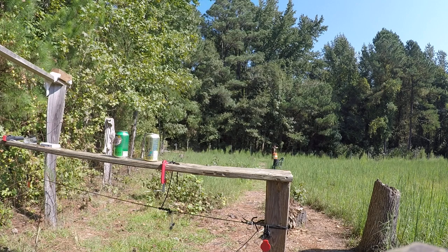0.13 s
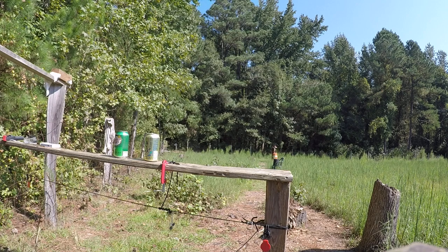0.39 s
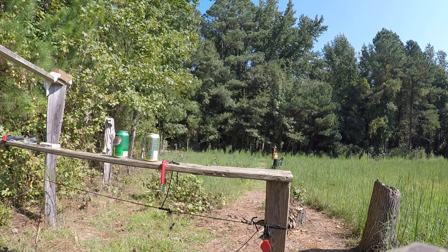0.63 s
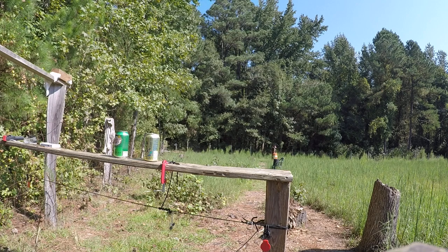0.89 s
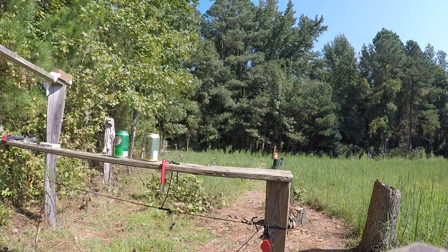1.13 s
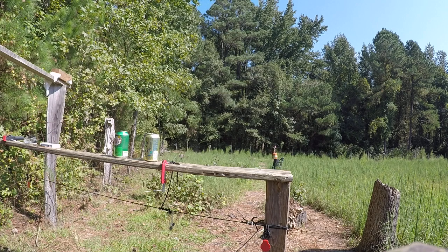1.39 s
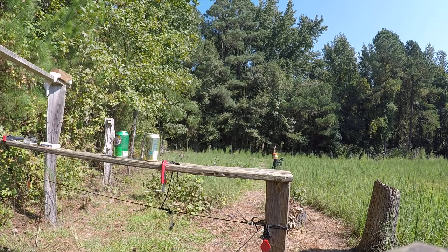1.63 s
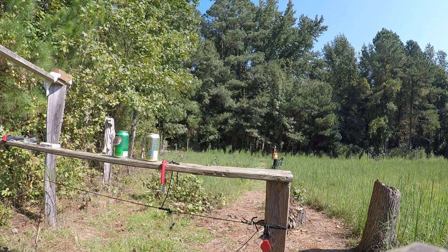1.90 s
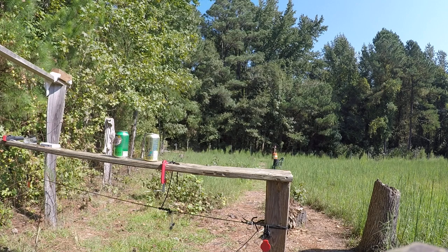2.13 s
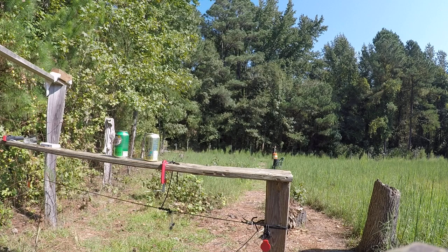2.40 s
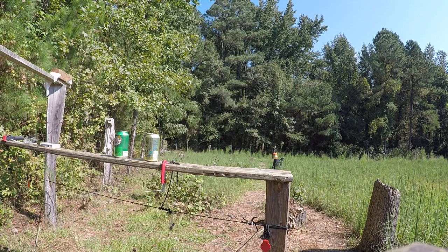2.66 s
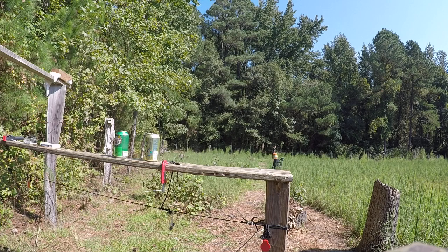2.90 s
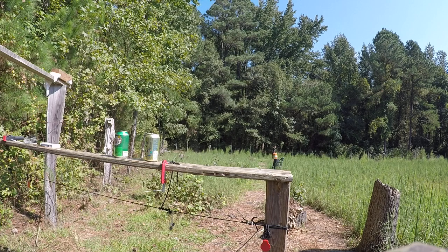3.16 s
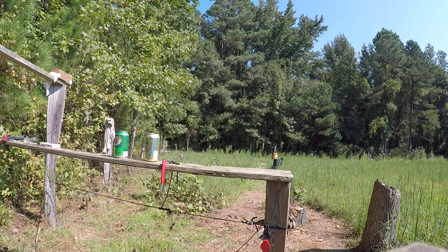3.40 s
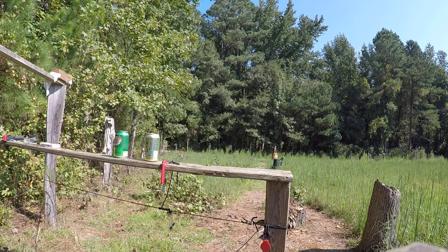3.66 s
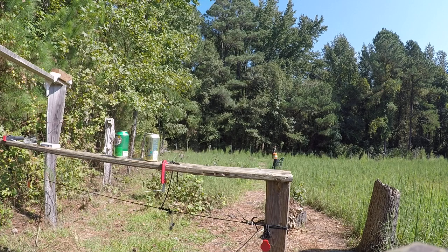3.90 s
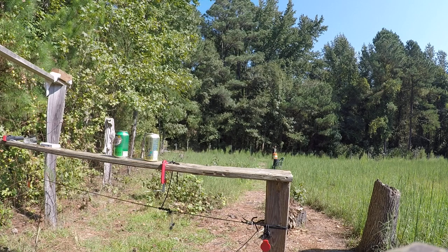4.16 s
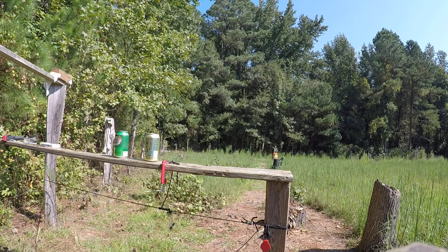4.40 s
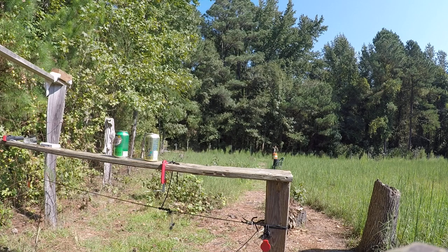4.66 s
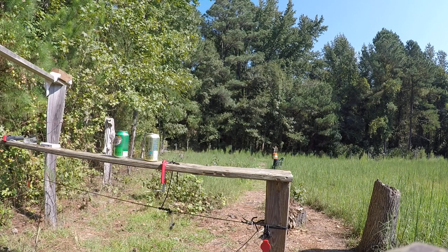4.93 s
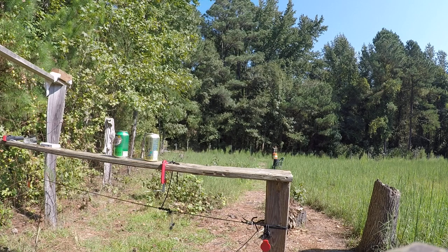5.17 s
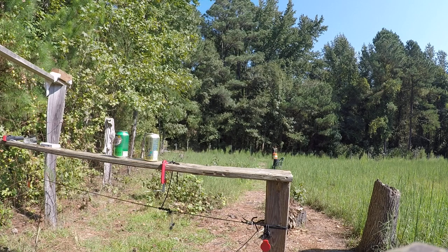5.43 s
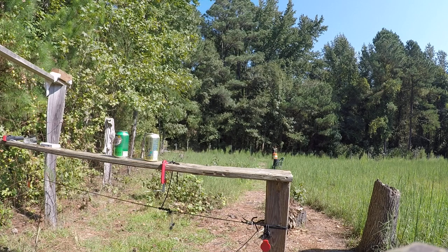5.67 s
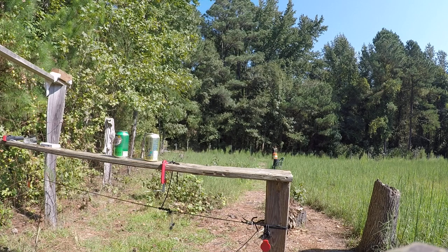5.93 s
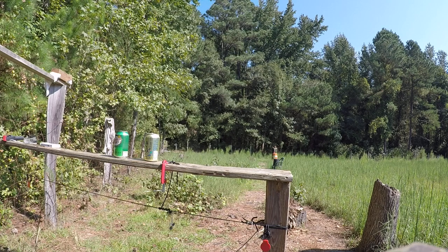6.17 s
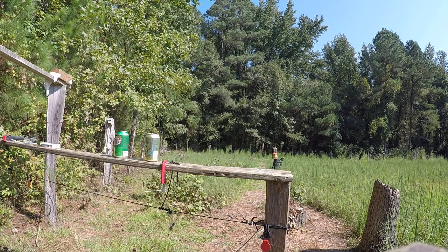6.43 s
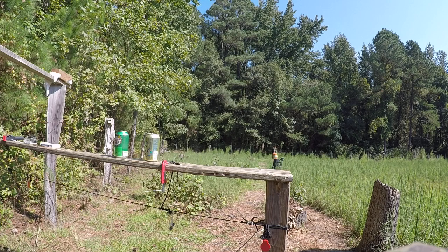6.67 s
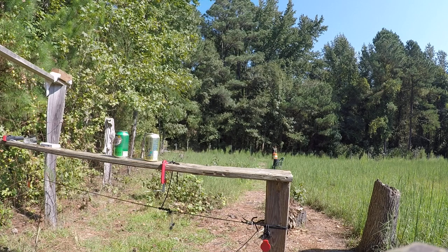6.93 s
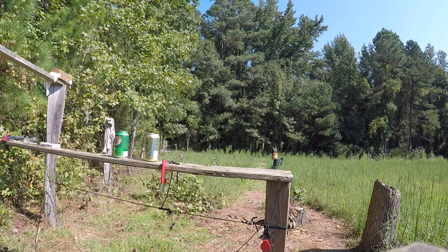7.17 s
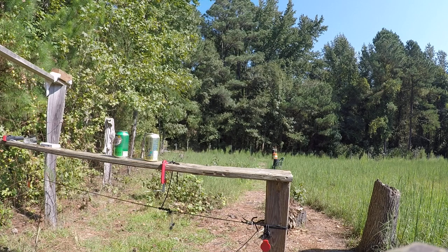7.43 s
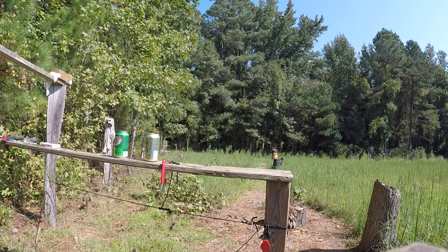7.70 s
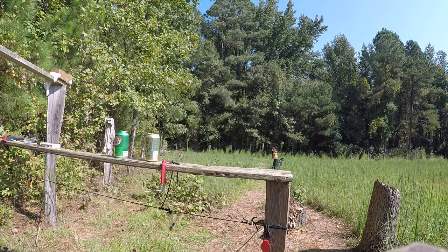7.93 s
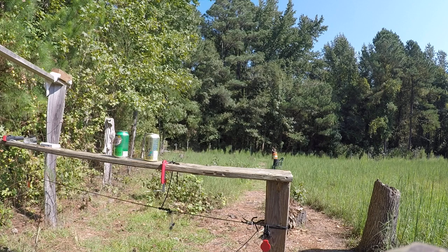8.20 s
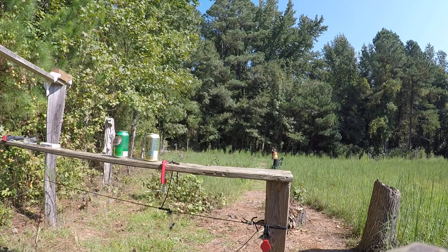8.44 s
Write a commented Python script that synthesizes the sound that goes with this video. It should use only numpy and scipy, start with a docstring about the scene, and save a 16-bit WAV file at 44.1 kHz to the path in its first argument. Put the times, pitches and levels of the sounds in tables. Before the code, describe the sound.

Continuous shrill insects, faint airy hush, distant idling engine and soft low wind buffets. Before the middle, a light double snap of a slingshot, then a tiny swish and tick leading into one violent, dry knock on a rail very close to the microphone, its pitch diving fast. The ball drops with a faint thud; insects and wind carry on, with barely audible far bird notes.

```python
"""A dense insect chorus, puffs of wind, a far idling engine and the hush of a field are heard first and last.
A slingshot is let go; its steel ball rustles closer, knocks, strikes a rail and drops.
Insects, wind, hush and rustle are filtered noise; the engine is a sum of orders of one slow cycle.
Clicks ring damped bodies for the rattles, and decaying noise gives their echoes. The blow is a falling
bending wave with decaying modes, and it overloads the microphone. Far bird notes are narrow noise."""
import sys
import numpy as np
from scipy import signal
from scipy.fft import rfft, irfft
from scipy.io import wavfile
from scipy.ndimage import uniform_filter1d

SR = 44100
rng = np.random.default_rng(int(sys.argv[2]) if len(sys.argv) > 2 else 0)


def to_wav(sig):
    """Store sig (one row per channel, or 1-D mono) as 16-bit WAV at the path in sys.argv[1].

    Samples outside -1..1 are clipped; the rate is SR.
    """
    pcm = np.clip(np.atleast_2d(sig), -1, 1) * 32767
    pcm = np.round(pcm).astype(np.int16)
    wavfile.write(sys.argv[1], SR, pcm.T)  # frames by channels


def gain_from_decibels(decibels):
    """Convert decibel values to linear amplitude factors."""
    exponent = np.asarray(decibels, float) / 20
    return 10 ** exponent


N = 377937  # samples in the scene


def evened(x):
    """Normalisation: scales to rms 1."""
    return x / np.sqrt(np.mean(x ** 2) + 1e-20)


def curve(rows):
    """Linear interpolation: a (time_s, value) table at every sample."""
    return np.interp(np.arange(N) / SR, *np.transpose(rows))


def add(mix, start_s, sound):
    """Superposition: adds a sound to the mix from its start time."""
    part = mix[round(start_s * SR):][:len(sound)]
    part += sound[:len(part)]


def coloured(points):
    """Spectral shaping: steady noise of rms 1 with a (frequency_hz, relative level_db) spectrum."""
    hz = np.fft.rfftfreq(N, 1 / SR)
    point_hz, point_db = np.transpose(points)
    gain = gain_from_decibels(np.interp(np.log(hz + 1), np.log(point_hz + 1), point_db))
    return evened(irfft(rfft(rng.standard_normal(N)) * gain, N))


def resonate(x, hz, width):
    """Damped resonance: one complex pole, of gain 1 at its centre."""
    pole = np.exp((2j * np.pi * hz - np.pi * abs(width)) / SR)
    return 2 * signal.lfilter([1 - abs(pole)], [1, -pole], x).real


def resonant_noise(length, hz, width):
    """Filtered noise: two equal resonances in series, evened to rms 1."""
    noise = rng.standard_normal(length)
    return evened(resonate(resonate(noise, hz, width), hz, width))


def drift(top_hz):
    """Random-phase synthesis: a wandering curve of rms 1 from sines between 0.2 Hz and top_hz."""
    t = np.arange(0, N, 64) / SR
    rates_hz = np.geomspace(.2, top_hz, num=24)
    slow = sum(np.sin(2 * np.pi * (f * t + rng.random())) / np.sqrt(f) for f in rates_hz)
    return np.interp(np.arange(N) / SR, t, evened(slow))


# Short modes at the point of the blow: pitch_hz [Hz], signed_size [amplitude], decay_ms [ms]
KNOCK_MODES = [(255, .3, 7.5), (1230, -.62, 2.04), (2340, -1.39, .69), (5190, .75, .62)]
# Long modes of the rail: pitch_hz [Hz], level_db [dB, starting peak], t60_s [s]
RAIL_MODES = [(495, -50, .62), (793, -52.5, .41), (1200, -60.5, 0.4985), (1620, -45, .22),
              (2250, -48.5, .25)]
BLOW_S = 3.82537


def blow():
    """Dispersion: treble bending waves in the rail arrive first, so the pitch dives; modes then decay."""
    ms = np.arange(SR // 2) / SR * 1000
    half_turns = (ms + .048) ** -.397 / .215 - .587
    dive = -np.sin(np.pi * half_turns) * (1 - np.exp(-ms / .241))
    dive *= 1.9 * np.exp(-ms / 14.0)
    knock = sum(size * np.exp(-ms / decay_ms) * np.sin(2 * np.pi * hz * ms / 1000)
                for hz, size, decay_ms in KNOCK_MODES)
    ring = sum(gain_from_decibels(db - 60 * ms / 1000 / t60) * np.sin(2 * np.pi * hz * ms / 1000)
               for hz, db, t60 in RAIL_MODES)
    # the rail sways on its posts
    sway = .05 * np.exp(-ms / 90) * np.sin(2 * np.pi * 36 * ms / 1000)
    return dive + knock + ring + sway


# Rustle of the ball coming near: time_s [s], level_db [dB]
FLIGHT_SWELL = [(3.729, -59.5), (3.769, -58), (3.79, -50), (3.808, -46), (3.815, -45.5), (3.826, -56.5)]


def flight():
    """Amplitude envelope on broadband noise: a rustle that swells as the ball nears; gives start and sound."""
    s, db = np.transpose(FLIGHT_SWELL)
    t = np.arange(s[0], s[-1], 1 / SR)
    noise = rng.standard_normal(len(t))
    rustle = evened(resonate(resonate(noise, 2100, 4033), 2500, 9000))
    return s[0], gain_from_decibels(np.interp(t, s, db)) * rustle


# Short rattles of clicks: start_s [s], level_db [dB], pitch_hz [Hz], length_s [s],
# bright_db [dB, bright edge against the body]
RATTLES = [(3.5288, -42, 1820, 0.0032, -24), (3.5318, -40.5, 1600, 0.0065, -17),
           (3.5325, -41.5, 5000, 0.0023, -18), (3.5368, -45, 5000, .0015, -12),
           (3.528, -45, 150, 0.0052, -50), (3.5718, -38, 4340, 0.0015, -3), (3.5739, -31.5, 3970, 0.001, 3),
           (3.5752, -37.5, 4100, 0.0025, 1.5), (3.5735, -58, 1290, .003, -40),
           (3.8044, -32.5, 1172, .0065, -15.5), (3.8055, -32.5, 520, .005, -39),
           (3.8115, -43, 1217, 0.018, -13), (4.1335, -49, 1150, 0.0017, -45), (4.134, -54, 2793, .001, -40),
           (4.1352, -37, 240, 0.0037, -60), (4.1412, -50, 480, 0.00202, -61.5)]
# ring width of a body at 1.5 kHz, and the power by which it grows with pitch
RING_WIDTH_HZ, RING_WIDENS = 1200, .8


def rattle(db, hz, length, bright_db):
    """Impulse excitation: uneven clicks ring a damped body, and a bright edge rides on top."""
    clicks = np.zeros(round((length + .02) * SR))  # 20 ms left to ring out
    count = max(round(length * SR), 8)
    uneven = np.prod(rng.standard_normal((2, 2000)), 0)[:count]
    clicks[:count] = uneven * signal.windows.tukey(count, .2)
    width = RING_WIDTH_HZ * (hz / 1500) ** RING_WIDENS
    body = evened(resonate(resonate(clicks, hz, width), hz, width))
    edge = evened(resonate(clicks, 6000, 10000))
    sound = evened(body + gain_from_decibels(bright_db) * edge)
    # the energy equals that of the stated level held over the clicks alone
    return gain_from_decibels(db) * sound * np.sqrt(count / len(clicks))


# Scattered echoes from leaves and ground: start_s [s], level_db [dB, before decay], pitch_hz [Hz],
# width_hz [Hz], t60_s [s]
ECHOES = [(3.535, -50, 1640, 1506, 0.34), (3.535, -59.5, 4992, 8000, 0.52), (3.576, -51.5, 4180, 1400, .42),
          (3.576, -54.5, 5925, 8996, 0.837), (3.828, -28, 6500, 5010, .07), (3.828, -12, 1000, 1597, 0.039),
          (3.83, -43.5, 3807, 5000, 0.41), (3.83, -35.5, 1200, 1511, .35), (3.83, -54, 597.4, 800, 1.2),
          (3.835, -35.5, 320, 300.3, .3), (4.14, -55.5, 400, 400, 0.28)]


def echo(db, hz, width, t60):
    """Diffuse reverberation: scattered reflections, uneven in strength, decay exponentially."""
    t = np.arange(SR) / SR
    lumps = gain_from_decibels(2.2 * evened(uniform_filter1d(rng.standard_normal(SR), size=200)))
    reflections = lumps * rng.standard_normal(SR)
    scatter = evened(resonate(resonate(reflections, hz, width), hz, 2.9 * width))
    return gain_from_decibels(db - 60 * t / t60) * scatter * np.minimum(t / 0.001, 1)  # 1 ms rise


# Insect wing resonances: pitch_hz [Hz], width_hz [Hz, each of three passes], level_db [dB, relative]
WING_BANDS = [(6924, 880, -64), (7374, 700, -61.5), (7840, 890, -63.5), (7820, 42, -78)]
# Swell of the whole chorus: time_s [s], level_db [dB]
CHORUS_SWELL = [(0, -59.5), (2, -59), (3.5, -58.5), (5, -59), (7, -58.5), (8.57, -59)]
# A broad insect hiss near 14 kHz: time_s [s], level_db [dB]
HIGH_HISS = [(0, -94.5), (5.6, -98), (6.2, -76), (7.5, -81), (8.57, -87.5)]


def insects():
    """Resonant filtering: dense clicks of many far wings; a throb and a hiss lie above the chorus."""
    chorus = np.zeros(N)
    for hz, width, db in WING_BANDS:
        sound = rng.standard_normal(N) * (rng.random(N) < .3)  # clicks on about 30 % of samples
        for _ in range(3):
            sound = resonate(sound, hz, width)
        chorus += gain_from_decibels(db) * evened(sound)
    chorus = evened(chorus) * gain_from_decibels(curve(CHORUS_SWELL) + 0.528 * drift(30))
    throb = resonant_noise(N, 9300, 900) * gain_from_decibels(-84.0 + 2.0 * drift(20))
    hiss = resonant_noise(N, 14000, 3000) * gain_from_decibels(curve(HIGH_HISS))
    return chorus + throb + hiss


# Path of the strongest engine tone: time_s [s], pitch_hz [Hz]
STRONGEST_TONE = [(0, 68.86), (.74, 70.7), (1.79, 72), (2.29, 68.34), (2.62, 72.4), (3.62, 71.4),
                  (4.06, 69.25), (5.2, 71.47), (7.18, 68.53), (7.69, 72.5), (8.57, 70.6)]
STRONGEST_ORDER = 10  # its order in the engine cycle
# Tones of the idling engine, keyed by order of the cycle: level_db [dB rms]
ORDER_DB = {8: -62.5, 9: -62.5, 10: -47.5, 11: -52, 12: -63, 13: -65, 14: -66.5, 15: -65, 19: -70.5, 20:
            -70.5}
UNSTEADY_DB = 0.5  # rms wavering of each tone
HALO_WIDTH_HZ, HALO_DB = 38.86, -54  # fuzz round the strongest tone; the width is of each of two passes
HUM_HZ, HUM_DB = 193, -73  # mean pitch and rms level of a faint hum


def engine():
    """Beating of harmonics: neighbouring orders of a far engine's slow cycle make a throb."""
    cycles = np.cumsum(curve(STRONGEST_TONE) / STRONGEST_ORDER) / SR
    tones = np.zeros(N)
    for order, db in ORDER_DB.items():
        level = gain_from_decibels(db + UNSTEADY_DB * drift(3))
        tones += level * np.sin(2 * np.pi * (order * cycles + rng.random()))
    hum_cycles = np.cumsum(HUM_HZ + .8 * drift(3)) / SR
    hum = gain_from_decibels(HUM_DB) * np.sin(2 * np.pi * hum_cycles)
    halo = resonant_noise(N, 71, HALO_WIDTH_HZ)
    return np.sqrt(2) * (tones + hum) + gain_from_decibels(HALO_DB) * halo  # root 2 turns peak into rms level


# Spectrum of wind pressure: frequency_hz [Hz], level_db [dB per Hz, relative]
WIND_COLOUR = [(10, -11.5), (22, 1.5), (45, 2), (75, -13), (110, -25.5), (200, -42), (400, -75)]
# Puffs of wind on the microphone: centre_s [s], level_db [dB], length_s [s]
PUFFS = [(0.275, -42, .1), (0.352, -43, 0.1), (0.494, -45, 0.17), (0.74, -47, 0.12), (0.942, -39, 0.21),
         (1.772, -37.5, 0.32), (1.875, -37, 0.057), (2.015, -36.5, 0.19), (2.11, -40, 0.041),
         (2.324, -41, 0.044), (2.53, -48, 0.4), (2.674, -33, 0.051), (2.786, -33, 0.14),
         (2.892, -43.5, 0.16), (3.015, -36, 0.088), (3.208, -47, 0.46), (3.564, -40.5, 0.058),
         (3.945, -37.5, .16), (4.168, -42.5, 0.095), (4.417, -43.5, 0.08), (4.711, -46, 0.06),
         (5.128, -47, 0.098), (5.767, -48, 0.23), (6.67, -41.5, 0.12), (6.75, -38.5, .09),
         (6.874, -48, 0.13), (6.982, -39.5, 0.067), (7.089, -44, .16), (7.49, -42, 0.077),
         (8.538, -49, .09)]
BREEZE_DB, FLUTTER_DB = -49, 3.0  # the light wind between puffs, and its rms wavering


def wind():
    """Turbulent pressure on the microphone: a wavering breeze, and puffs that swell and sink."""
    air = coloured(WIND_COLOUR)
    out = gain_from_decibels(BREEZE_DB + FLUTTER_DB * drift(6)) * air
    for centre_s, db, length in PUFFS:
        start_s = centre_s - length / 2
        piece = air[round(start_s * SR):round((centre_s + length / 2) * SR)]
        add(out, start_s, gain_from_decibels(db) * evened(piece * np.hanning(len(piece))))
    return out


# Faint, blurred far bird notes: start_s [s], level_db [dB, before the fades], pitch_hz [Hz], length_s [s]
CHIRPS = [(1.465, -71, 2250, 0.036), (1.50, -73, 2250, 0.031), (1.945, -70, 2860, 0.09),
          (5.94, -70, 2464, .04), (6.55, -73, 2450, .04), (6.63, -71, 2450, .04), (7.325, -71, 2300, .045),
          (7.41, -75, 2443, 0.042), (7.48, -71, 2420, 0.034)]


def chirp(db, hz, length):
    """Narrow-band noise under a smooth window: a soft note smeared by distance."""
    count = round(length * SR)
    breath = resonant_noise(4000, hz, 300)
    return gain_from_decibels(db) * np.hanning(count) * breath[-count:]


# Spectrum of the field's hush: frequency_hz [Hz], level_db [dB per Hz, relative]
HUSH_COLOUR = [(90, -2.5), (160, -3.5), (300, -11.5), (600, -15), (2500, -20), (6000, -24.5), (9700, -27.5),
               (10200, -30), (15000, -30), (17000, -28.5)]
HUSH_DB = -60.5


def hush():
    """Stationary coloured noise: the hush of the field, its level wavering slightly."""
    return gain_from_decibels(HUSH_DB + 0.58 * drift(8)) * coloured(HUSH_COLOUR)


def scene():
    """Superposition: the field throughout, with the shot laid over it."""
    mix = hush() + wind() + engine() + insects()
    for table, source in (RATTLES, rattle), (ECHOES, echo), (CHIRPS, chirp):
        for start_s, *settings in table:
            add(mix, start_s, source(*settings))
    add(mix, *flight())
    add(mix, BLOW_S, blow())
    return mix[None]


def top_cut(x):
    """Nothing passes above the cut-off."""
    return signal.sosfilt(signal.butter(12, 16560, fs=SR, output="sos"), x)


def record(dry):
    """Gain control and saturation: bass roll-off, ducking after the blow, firm overload, band limit."""
    x = signal.lfilter(*signal.butter(1, 14, "high", fs=SR), dry)
    fall_db = np.arange(N) * 60. / SR  # the peak follower falls 60 dB a second
    level_db = 20 * np.log10(abs(x[0]) + 1e-9)
    peak_db = np.maximum.accumulate(level_db + fall_db) - fall_db
    over_db = np.maximum(peak_db + 0.5, 0)  # excess above -0.5 dB
    smooth_db = signal.lfilter([.002], [1, -(1 - .002)], over_db)
    x = x / gain_from_decibels(.6 * smooth_db)
    x = .94 * x / (.94 ** 4 + x ** 4) ** (1 / 4)  # overload: bends towards a ceiling of 0.94
    low_pass = signal.firwin(511, 15320, window=("kaiser", 9), fs=SR)  # edge in Hz
    x = signal.oaconvolve(x, low_pass[None], "same")
    return top_cut(x)


dry = scene()
out = record(dry)
to_wav(out)
```